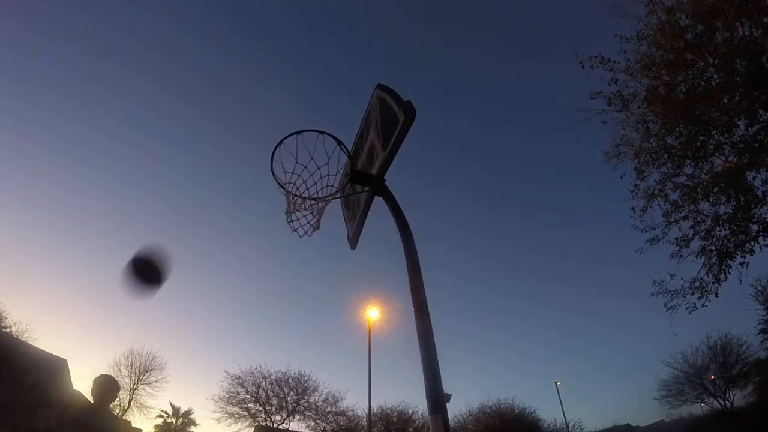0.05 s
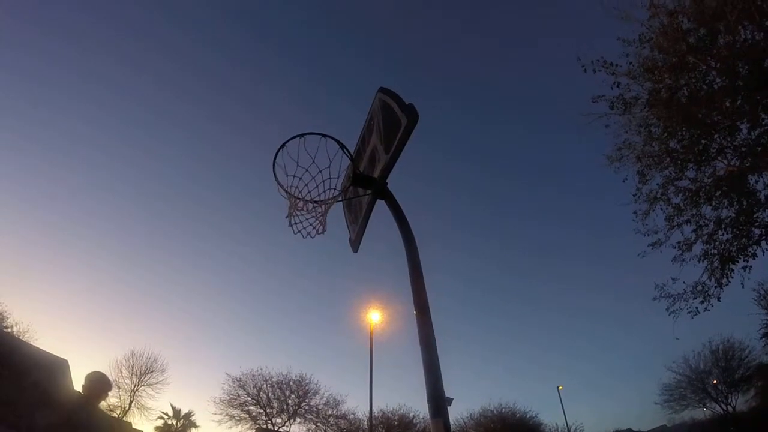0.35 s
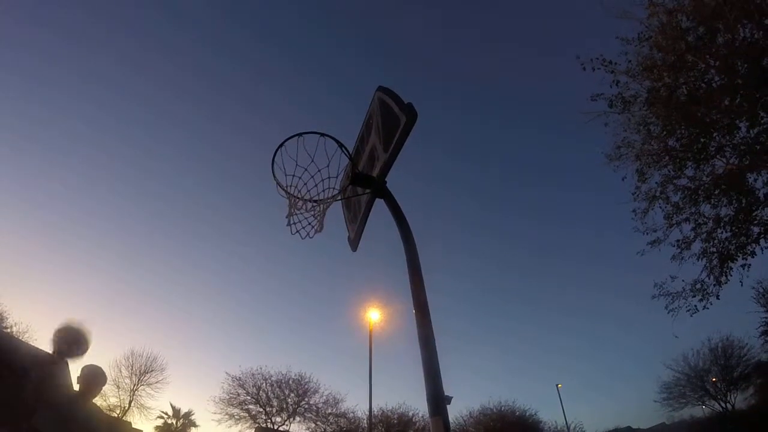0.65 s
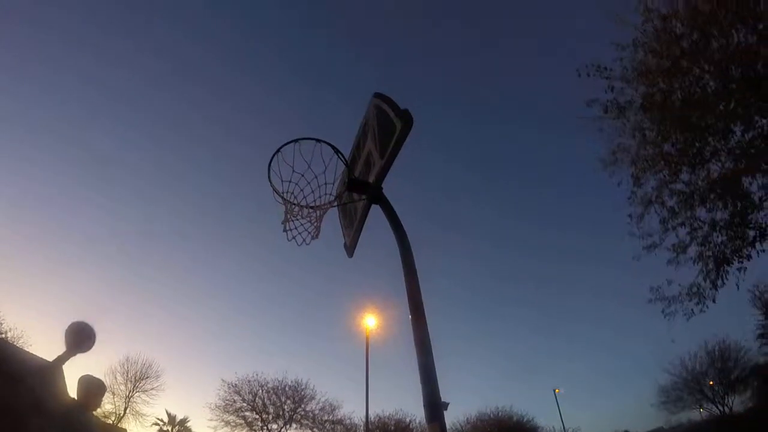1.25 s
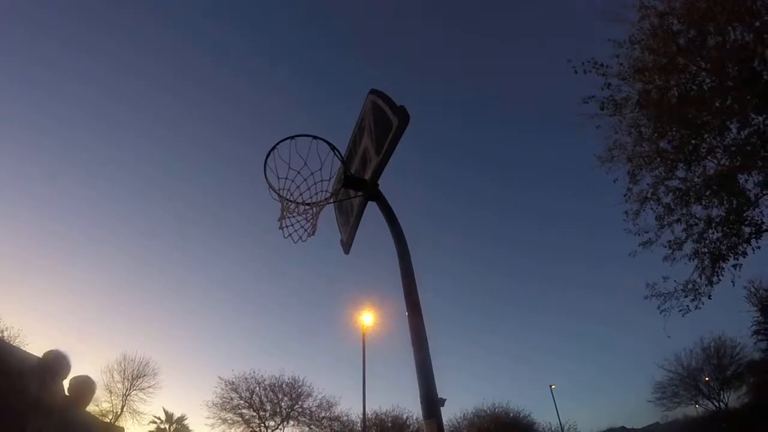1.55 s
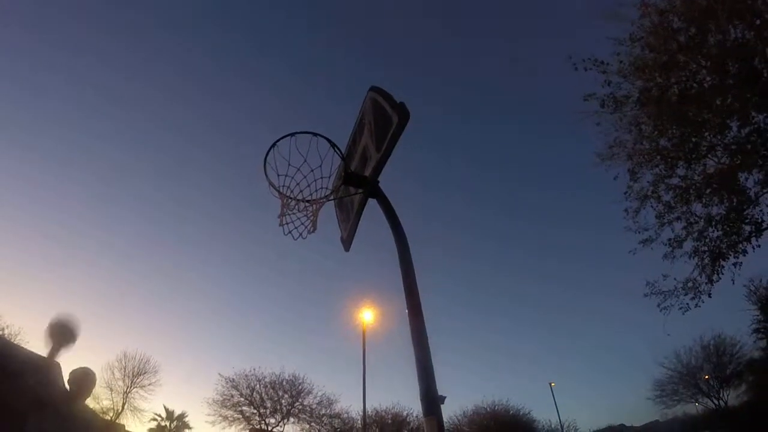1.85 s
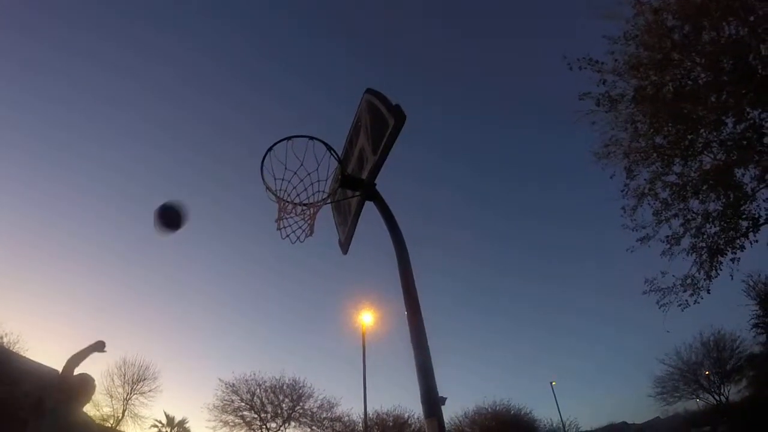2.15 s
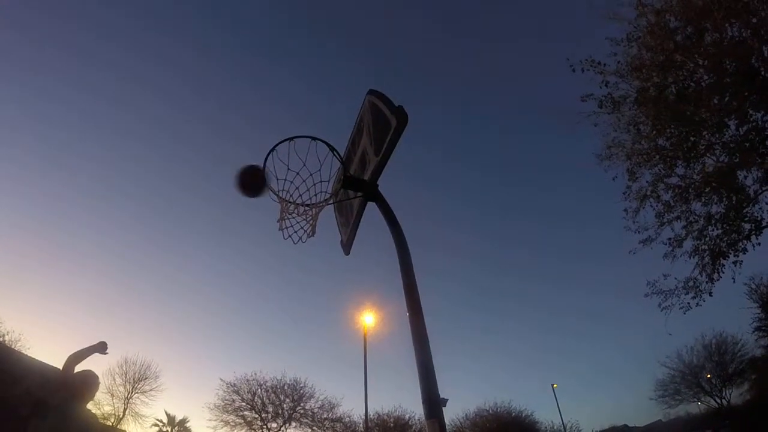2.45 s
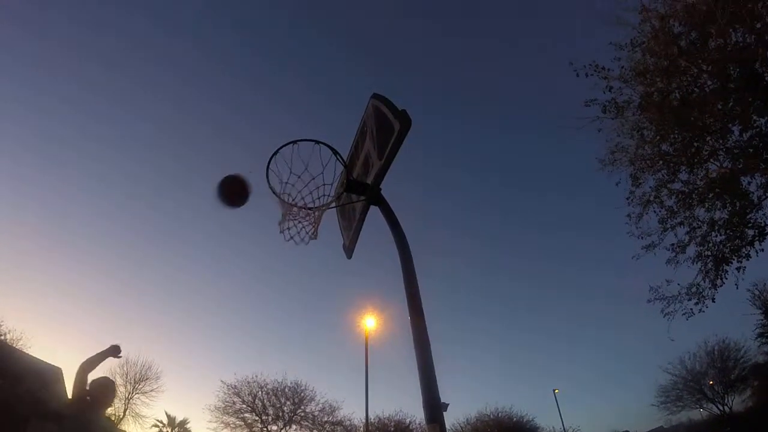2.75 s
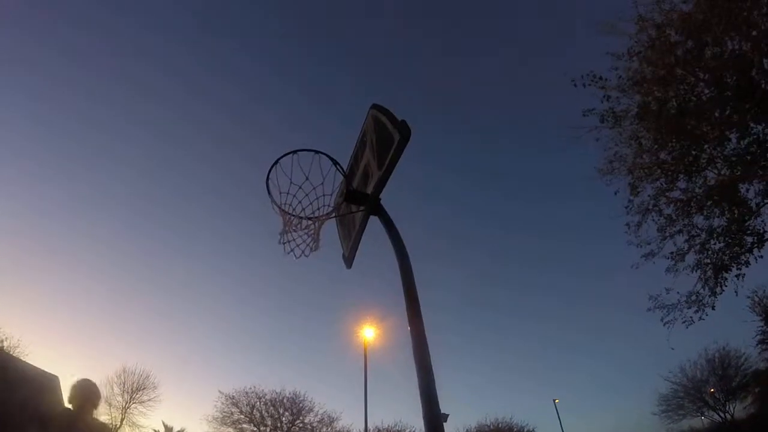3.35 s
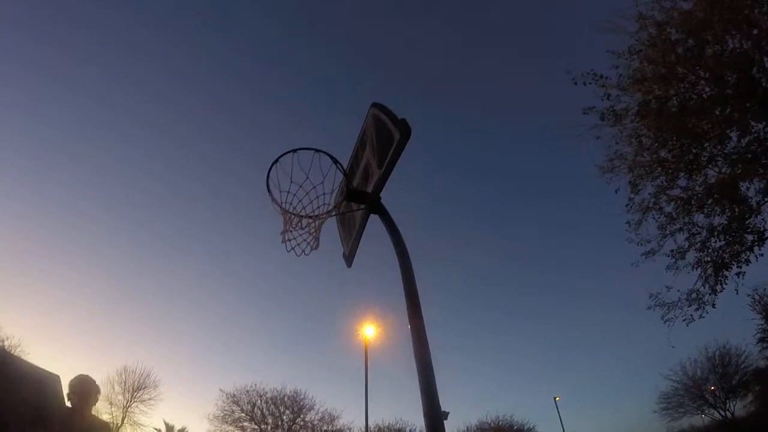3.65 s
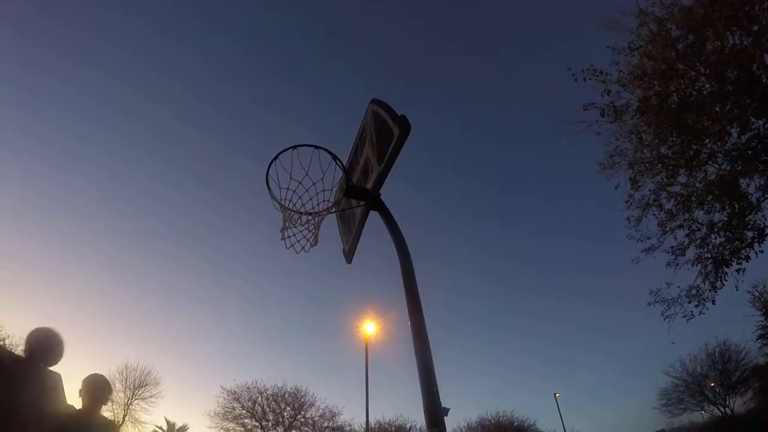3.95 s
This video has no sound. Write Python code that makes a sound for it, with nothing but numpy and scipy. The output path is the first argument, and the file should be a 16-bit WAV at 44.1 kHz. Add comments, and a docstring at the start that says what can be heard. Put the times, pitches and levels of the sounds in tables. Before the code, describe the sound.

A basketball slaps the ground on an outdoor court, then thumps dryly close by. It clips the rim, loose metal chinks, and a louder thump follows. A distant backboard booms softly over light wind and town rumble.

```python
"""Outdoor basketball court at dusk.

Light wind rumbles over a distant town. A ball slaps the ground with a thud and a ring; the court echoes.
A far backboard booms and wobbles under several blows; a damped body thumps dryly close by.
The ball clips the rim and leaves loose metal chinking at the hoop; a small tap follows."""
import sys
import numpy as np
from scipy import signal
from scipy.fft import rfft, irfft
from scipy.io import wavfile
from scipy.ndimage import uniform_filter1d

SR = 44100
rng = np.random.default_rng(int(sys.argv[2]) if len(sys.argv) > 2 else 0)


def master_out(mix):
    """Clip the mix to full scale and print it as 16-bit PCM to the path in sys.argv[1]."""
    frames = np.transpose(np.atleast_2d(mix))
    ceiling = np.clip(frames, -1, 1)
    pcm = np.round(ceiling * 32767).astype(np.int16)
    wavfile.write(sys.argv[1], SR, pcm)


N = 176400
T = np.arange(N) / SR


def undb(db):
    """Decibels to gain."""
    return 10 ** (np.asarray(db) / 20)


def fade(t60_s):
    """Exponential decay, 60 dB down at t60_s."""
    return np.exp(-np.log(1000) * T / t60_s)


def rise(tau_s):
    """Soft onset."""
    return (1 - np.exp(-T / tau_s)) ** 2


def bell(length_s):
    """Half Gaussian: holds, then falls to 1/e at length_s."""
    return np.exp(-(T / length_s) ** 2)


def at(start_s, x):
    """Delay x to start_s."""
    return np.concatenate([np.zeros(int(start_s * SR)), x])[:N]


def tone(hz, t60_s):
    """One decaying mode."""
    return np.sin(2 * np.pi * hz * T) * fade(t60_s)


def ring(modes, scatter=False):
    """Modes struck together; scatter randomises their signs."""
    signs = rng.choice([-1, 1], len(modes)) if scatter else np.ones(len(modes))
    return sum(sign * undb(db) * tone(hz, t60_s) for sign, (hz, db, t60_s) in zip(signs, modes))


def shimmer(modes):
    """Sustained modes of a shaking panel, random phases."""
    return sum(undb(db) * np.sin(2 * np.pi * (hz * T + rng.random())) for hz, db in modes)


def colour(x, points):
    """Minimum-phase filter through (Hz, dB) points; keeps the power of white noise."""
    hz, db = np.array(points, float).T
    bins_hz = np.maximum(np.arange(N + 1) * SR / (2 * N), 1)
    gain = undb(np.interp(np.log(bins_hz), np.log(hz), db))
    gain /= np.sqrt(np.mean(gain ** 2))
    cepstrum = irfft(np.log(gain))
    cepstrum[1:N] *= 2
    cepstrum[N + 1:] = 0
    return irfft(rfft(x, 2 * N) * np.exp(rfft(cepstrum)))[:N]


def noise():
    """White noise."""
    return rng.standard_normal(N)


def walk(rate_hz):
    """Slow random drift, unit spread."""
    hold = int(SR / rate_hz)
    steps = np.repeat(rng.standard_normal(N // hold + 1), hold)
    drift = uniform_filter1d(steps, hold)[:N]
    return drift / drift.std()


def town():
    """Steady noise of the distant town."""
    # (frequency [Hz], density [dB])
    spectrum = [(40, -15.5), (100, -0.5), (150, 0), (220, -4), (320, -7), (550, -11.5), (750, -14.5),
                (1100, -17.5), (2000, -22), (3400, -26), (6000, -32.5), (9000, -37), (11500, -42.5),
                (14000, -49.5)]
    return undb(-56.5) * colour(noise(), spectrum)


def wind():
    """Light wind rumbles on the microphone, gusting slightly."""
    # (frequency [Hz], density [dB])
    spectrum = [(8, 3), (18, -5), (32, 0.5), (50, -14.5), (80, -18), (130, -30), (250, -65.5)]
    mean_db, gust_db = -40, 1
    gain = undb(mean_db + gust_db * walk(rate_hz=16))
    return gain * colour(noise(), spectrum + [(2000, -100)])


def bounce():
    """The ball slaps the ground with a thud and a ring; a low boom, court scatter and echoes follow."""
    # low thud and bright ring of the bounce (frequency [Hz], level [dB], t60 [s])
    bounce_modes = [(140, 3.5, 0.057), (194, 2.5, 0.049), (486, -10.5, 0.063), (620, -16, 0.066),
                    (839, -11, 0.044), (1190, -17, 0.1), (1400, -10, 0.05), (1590, -8.5, .03),
                    (1750, -17, 0.024), (2150, -27, 0.026), (2880, -12, 0.036), (3370, -17.5, 0.04),
                    (4700, -13, 0.013)]
    # (frequency [Hz], density [dB])
    slap_spectrum = [(300, 1.5), (1000, 3), (1600, 6), (2200, -4.5), (3300, -2), (3900, -11.5), (4800, -5),
                     (5700, -17), (6500, -9), (9000, -21.5), (11000, -42), (14000, -60)]
    # early reflections (time [s], level [dB])
    reflections = [(0.444, -44.5), (0.4827, -49.5), (0.5115, -56), (0.5287, -52.5)]
    # slap returned by the court (frequency [Hz], density [dB])
    court_spectrum = [(150, 11), (500, 2.5), (1400, 2), (2200, -0.5), (3100, 2), (3900, -12), (4800, -8),
                      (5500, -16.5), (6300, -6.5), (7300, -23), (11000, -46)]
    start_s = 0.4198
    impact = undb(-31) * ring(bounce_modes) * rise(0.00008)
    slap = undb(-34.5) * colour(noise() * fade(t60_s=0.026), slap_spectrum)
    boom = undb(-24.5) * tone(hz=61.6, t60_s=0.357) * rise(0.024)
    scatter = at(start_s, undb(-51) * fade(t60_s=0.46) * rise(0.0026))
    echoes = sum(at(echo_s, undb(db) * fade(t60_s=0.037)) for echo_s, db in reflections)
    court = colour(noise() * np.hypot(scatter, echoes), court_spectrum)
    return at(start_s, impact + slap + boom) + court


def snap():
    """Short dry noise burst that opens a backboard blow or a thump."""
    # (frequency [Hz], density [dB])
    spectrum = [(400, -6), (600, 3.5), (850, 6.5), (1100, -2), (1600, -2), (2050, -2.5), (2400, -7.5),
                (2800, 1), (3300, -8), (3900, -21), (6000, -30), (10000, -40)]
    return colour(noise() * fade(t60_s=0.035), spectrum)


def backboard():
    """The far panel booms and hums while it swings on its pole, rattling once a swing."""
    # (time [s], length [s], rise [s], panel [dB], hum [dB], upper modes re panel [dB],
    #  wobble [dB], rattle [dB], snap [dB])
    blows = [(1.2976, 0.054, 0.0028, -39, -34, -12, -56, -67, -49.5),
             (3.338, 0.053, .006, -51, -48.5, -8, -60, -64.5, -70),
             (3.408, 0.041, 0.006, -39.5, -44, -6, -46, -60, -68),
             (3.453, 0.049, 0.0056, -42.5, -40.5, -5.5, -42, -64.5, -75),
             (3.752, .11, 0.0049, -43, -41, -1.5, -25, -57.5, -72)]
    # lower panel modes (frequency [Hz], level [dB])
    low_modes = [(70, 0), (101, -9), (126, 1), (143, -1.5), (243, -18)]
    # upper panel modes (frequency [Hz], level [dB])
    high_modes = [(285, -13.5), (342, -15), (384, -8.5), (470, -32), (860, -22), (1160, -31), (1305, -35)]
    # (frequency [Hz], density [dB])
    rattle_spectrum = [(200, -8), (500, 8.5), (750, 0), (1150, 2), (1700, -8.5), (2500, -18), (6000, -40)]
    swing_hz, hum_hz, rattle_depth = 36.3, 187.6, 0.96
    swing = np.cos(2 * np.pi * swing_hz * T)
    hum = np.sin(2 * np.pi * hum_hz * T)
    out = 0
    for start_s, length_s, rise_s, panel_db, hum_db, upper_db, wobble_db, rattle_db, snap_db in blows:
        panel = shimmer(low_modes) + undb(upper_db) * shimmer(high_modes)
        boom = (undb(panel_db) * panel + undb(hum_db) * hum) * rise(rise_s) * bell(length_s)
        wobble = undb(wobble_db) * swing * rise(0.031) * bell(4 * length_s)
        pulses = bell(length_s) * (1 + rattle_depth * swing)
        rattle = undb(rattle_db) * colour(noise() * pulses, rattle_spectrum)
        out += at(start_s, boom + wobble + rattle + undb(snap_db) * snap())
    return out


def thumps():
    """Soft contacts push a heavily damped body, each with a two-note clack, a ping and a snap."""
    # (time [s], body [dB], contact [s], ring [Hz], ring re body [dB], sway [Hz], sway re body [dB],
    #  snap [dB], upper clack [dB], lower clack [Hz], lower clack [dB], ping [dB])
    hits = [(1.6013, -29, 0.0037, 230, -8, 52.3, -1, -51, -47, 960, -54, -46),
            (2.1793, -21, 0.0032, 219, 6.5, 36.4, 1.5, -39.5, -42, 720, -37, -43.5),
            (3.0238, -14, 0.0013, 166, -10, 57, -15, -47.5, -28, 950, -30.5, -40)]
    # (frequency [Hz], level [dB], t60 [s])
    body_modes = [(105, -7, 0.012), (154.5, -4.5, 0.037), (233, -9.5, 0.031)]
    # (frequency [Hz], level [dB], t60 [s])
    ping_modes = [(2720, -16, 0.013), (2940, 4, 0.014)]
    upper_hz, clack_t60_s = 1316, 0.018
    out = 0
    for (start_s, body_db, contact_s, ring_hz, ring_db, sway_hz, sway_db,
         snap_db, upper_db, lower_hz, lower_db, ping_db) in hits:
        push = np.sin(np.pi * T[T < contact_s] / contact_s)
        note = undb(ring_db) * tone(ring_hz, t60_s=0.037)
        sway = undb(sway_db) * tone(sway_hz, t60_s=0.14)
        body = undb(body_db) * np.convolve(ring(body_modes) + note + sway, push / push.sum())[:N]
        clack_modes = [(lower_hz, lower_db, clack_t60_s), (upper_hz, upper_db, clack_t60_s)]
        clack = ring(clack_modes) * rise(0.00058)
        ping = undb(ping_db) * ring(ping_modes) * rise(0.00032)
        out -= at(start_s, body + clack + ping + undb(snap_db) * snap())
    return out


def knocks():
    """Ball on the rim, then a small tap; the softer contact dulls the upper modes."""
    # (time [s], level [dB], relative hollow note [dB], relative tick [dB], tilt [dB/octave])
    hits = [(2.568, -49.5, -8, -12, 7.5), (3.2207, -46, 0, -4.5, -7)]
    # (frequency [Hz], level [dB], t60 [s])
    modes = [(930, -10, .05), (1157, -0.5, 0.029), (1327, -7, 0.081), (1550, 0.5, 0.029),
             (1630, -11, 0.083)]
    # (frequency [Hz], density [dB])
    tick_spectrum = [(1500, 0), (3000, 0), (4200, -10), (5300, 1), (6500, -6), (8000, -1.5), (10500, -26)]
    lowest_hz = modes[0][0]
    out = 0
    for start_s, level_db, hollow_db, tick_db, db_per_octave in hits:
        tilted = [(hz, db + db_per_octave * np.log2(hz / lowest_hz), t60_s) for hz, db, t60_s in modes]
        tick = undb(tick_db) * colour(noise() * fade(t60_s=0.013), tick_spectrum)
        hollow = undb(hollow_db) * tone(hz=470, t60_s=0.12)
        out += at(start_s, undb(level_db) * (ring(tilted, scatter=True) + hollow + tick))
    return out


def hoop_rattle():
    """Loose metal chinks at slightly varying pitch and leaves a thin, high ring over a dying chatter."""
    # (time [s], level [dB])
    chinks = [(2.568, -48), (2.5959, -44.5), (2.604, -46), (2.631, -56), (2.663, -69), (2.681, -60),
              (2.696, -56), (2.741, -50.5), (2.749, -55), (2.769, -62), (2.8015, -64), (2.8297, -51.5),
              (2.8826, -55.5)]
    # (frequency [Hz], density [dB])
    metal_spectrum = [(1000, -5.5), (2400, -17), (2750, 1.5), (2950, 0), (3300, -2.5), (3700, -18),
                      (4200, -9.5), (5200, -19), (7900, -23.5), (11000, -38)]
    # (frequency [Hz], level [dB], t60 [s])
    ring_modes = [(2880, -15.5, .3), (2945, -21, 0.68), (3260, -22, .3)]
    chink_hz, pitch_spread, chink_t60_s = 3010, 0.017, 0.035
    chatter_start_s, contacts_per_s = 2.573, 630
    out = 0
    for start_s, db in chinks:
        note = tone(chink_hz * (1 + pitch_spread * rng.standard_normal()), chink_t60_s)
        grit = undb(-6) * colour(noise() * fade(chink_t60_s), metal_spectrum)
        out += at(start_s, undb(db) * (note + grit + ring(ring_modes, scatter=True)))
    contacts = (rng.random(N) < contacts_per_s / SR).astype(float)
    chatter = signal.fftconvolve(contacts, fade(t60_s=0.023))[:N]
    chatter /= np.sqrt(np.mean(chatter ** 2))
    envelope = at(chatter_start_s, undb(-59) * chatter * bell(length_s=0.2))
    return out + colour(noise() * envelope, metal_spectrum)


def scene():
    """All sources, mono."""
    return (bounce() + thumps() + knocks() + hoop_rattle() + backboard() + town() + wind())[None]


def record(dry):
    """Steep low-pass cuts the top treble."""
    cutoff_hz = 13800
    return signal.sosfilt(signal.ellip(8, 0.2, 70, cutoff_hz, fs=SR, output="sos"), dry)


dry = scene()
out = record(dry)
master_out(out)
```